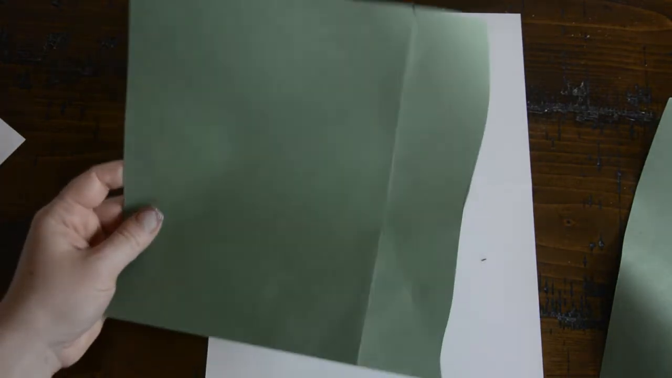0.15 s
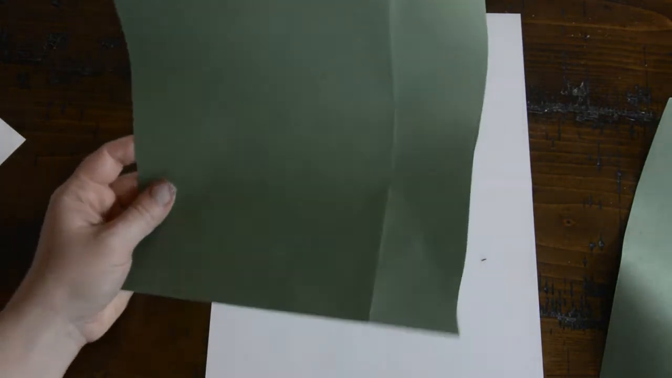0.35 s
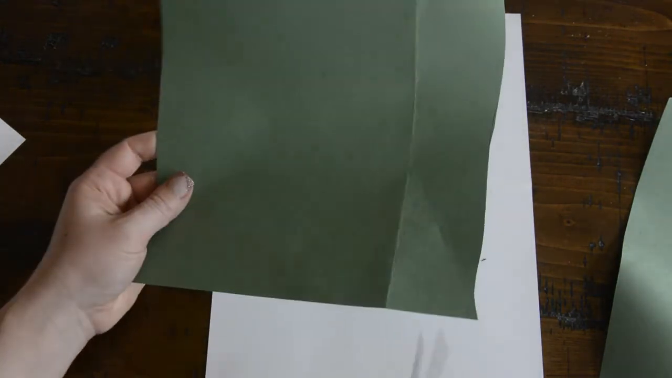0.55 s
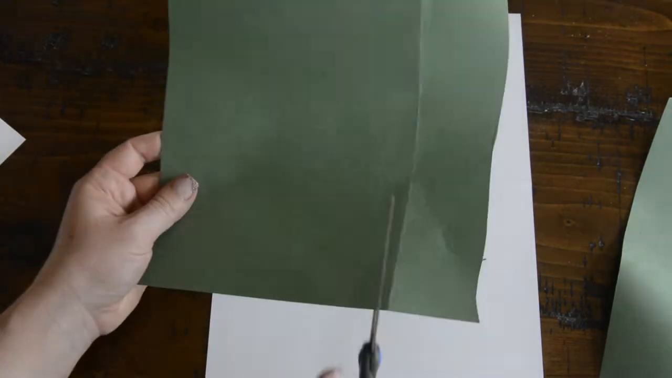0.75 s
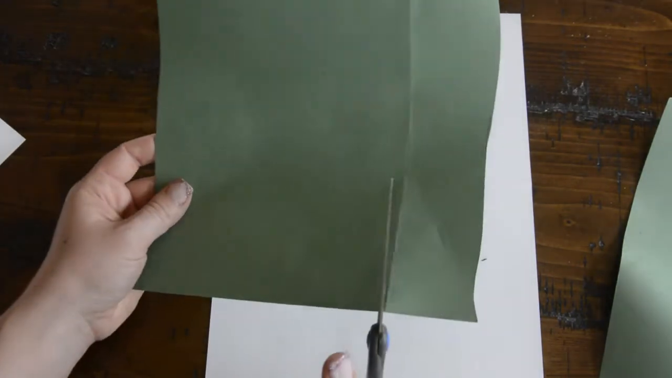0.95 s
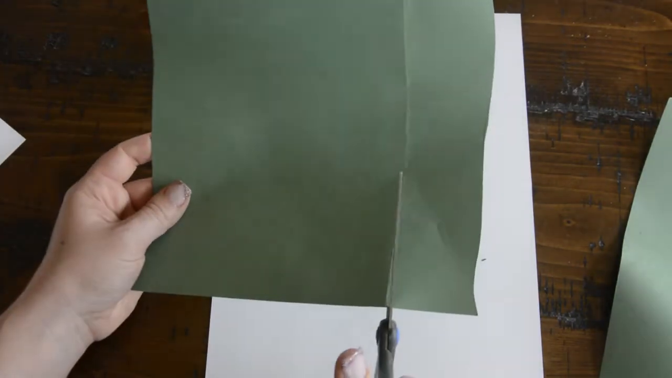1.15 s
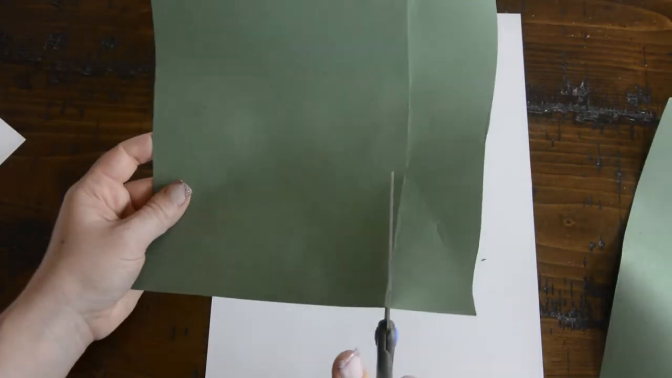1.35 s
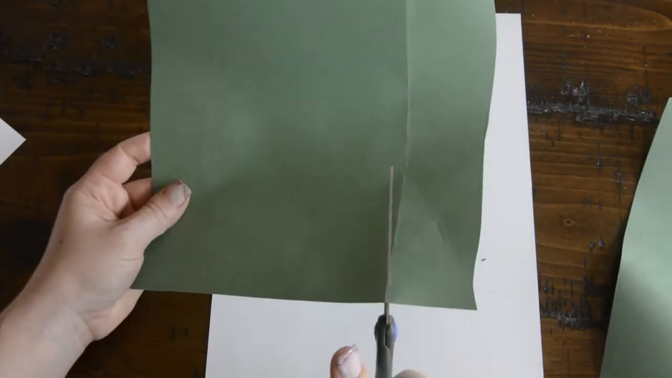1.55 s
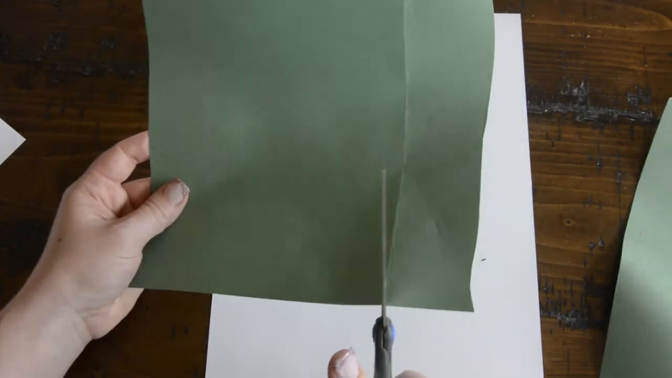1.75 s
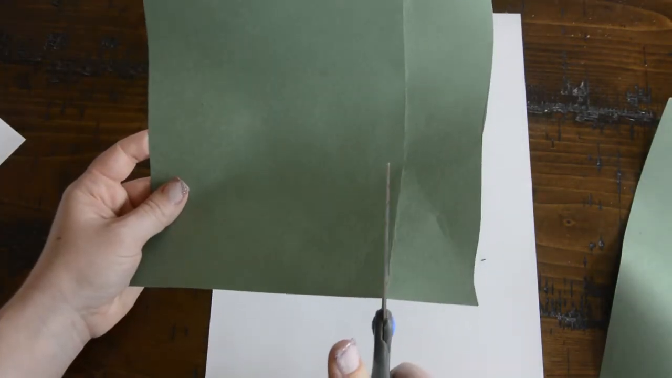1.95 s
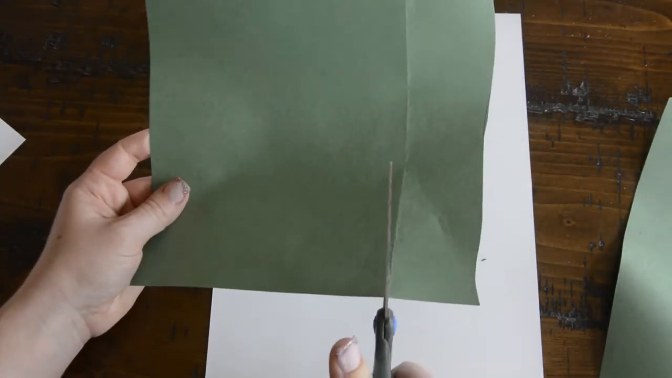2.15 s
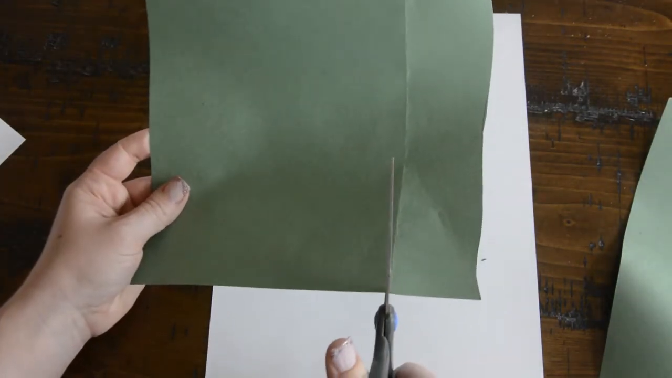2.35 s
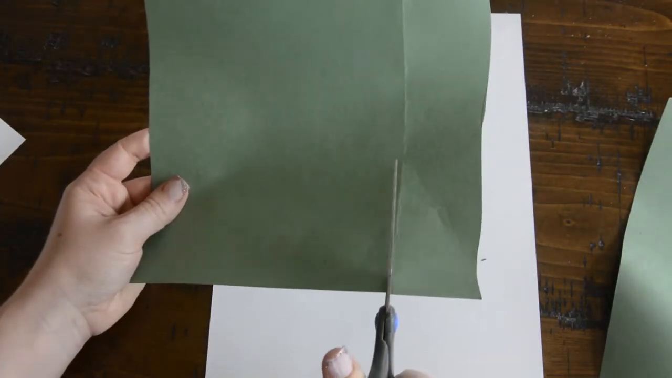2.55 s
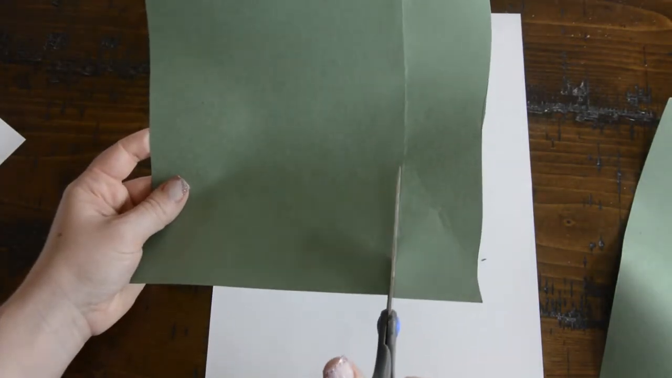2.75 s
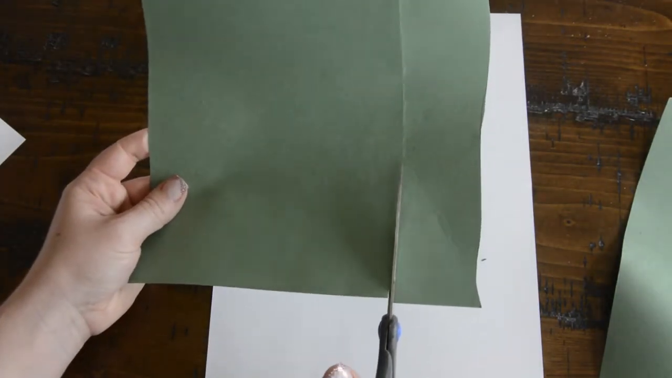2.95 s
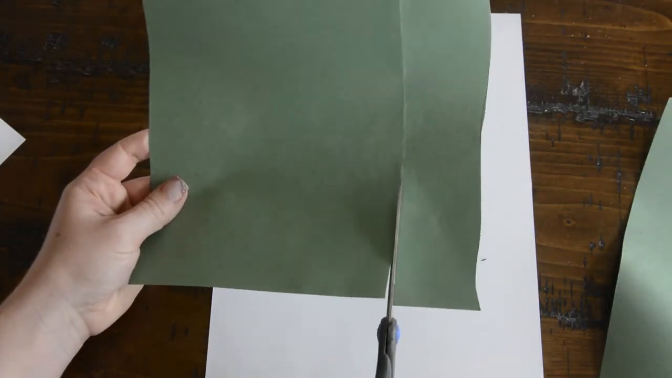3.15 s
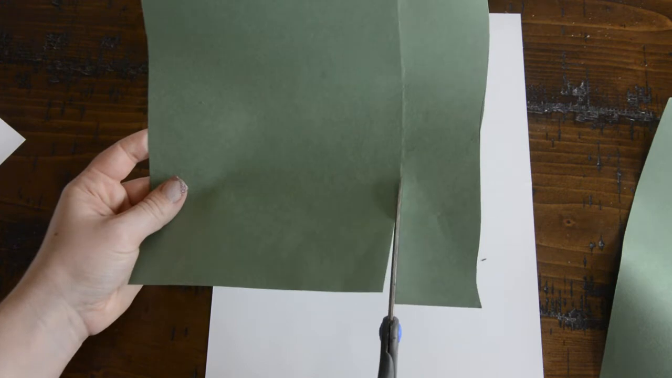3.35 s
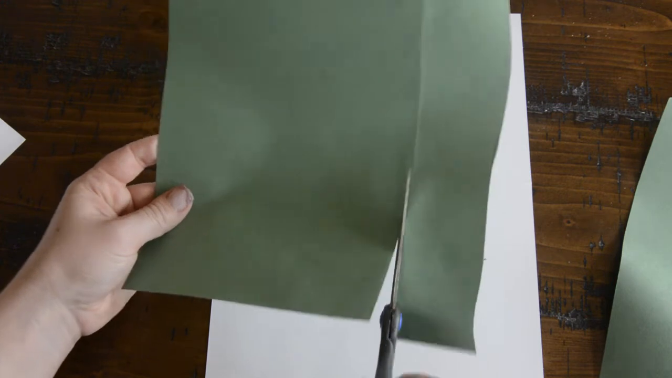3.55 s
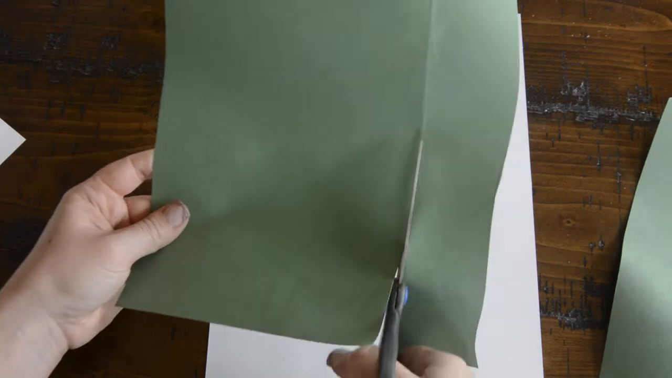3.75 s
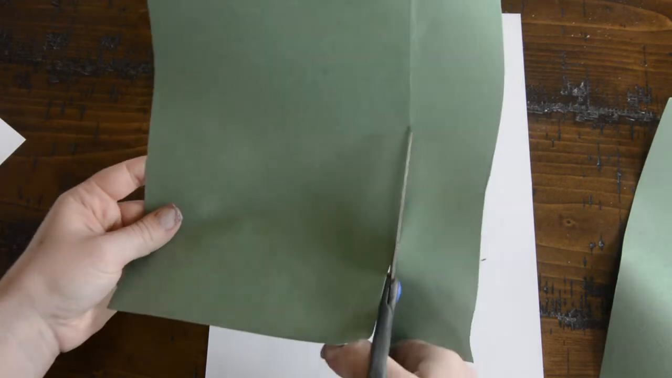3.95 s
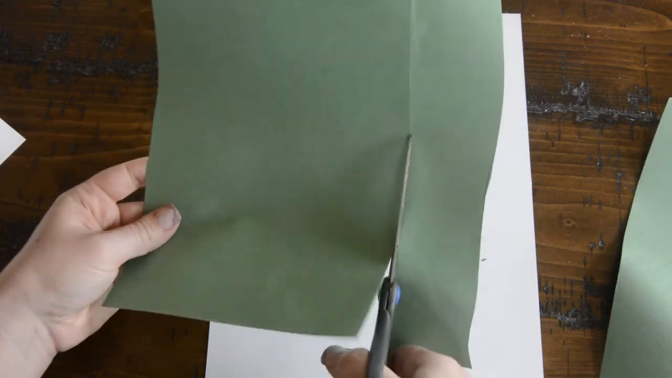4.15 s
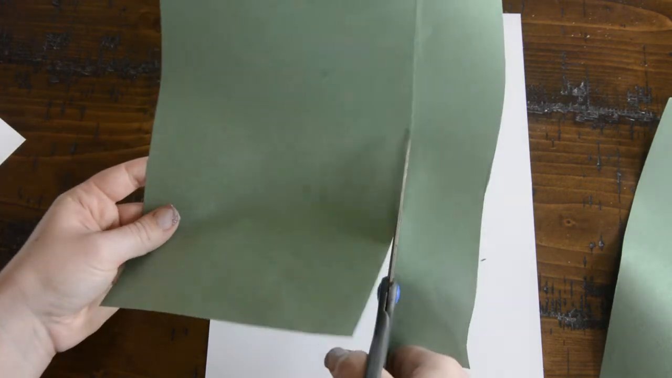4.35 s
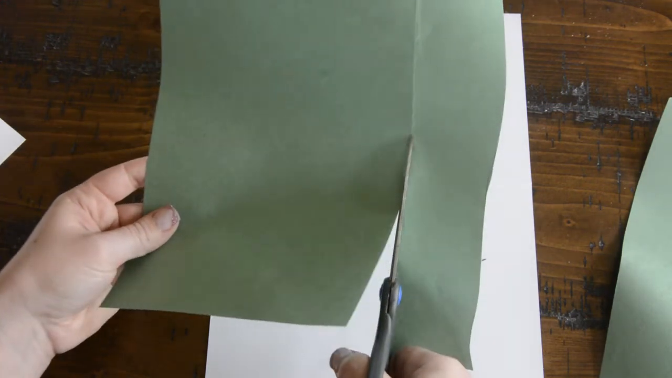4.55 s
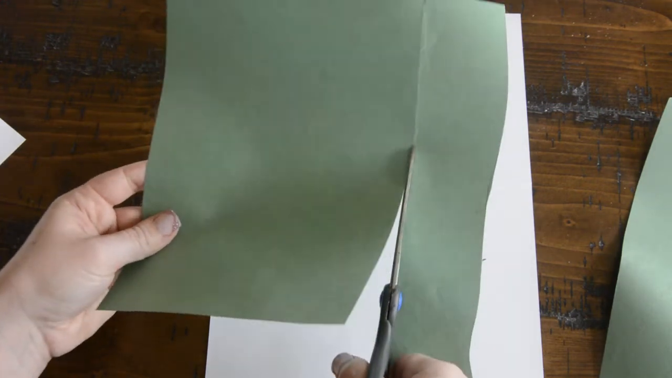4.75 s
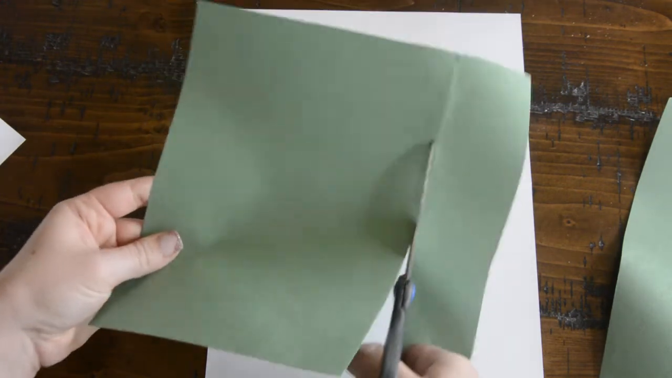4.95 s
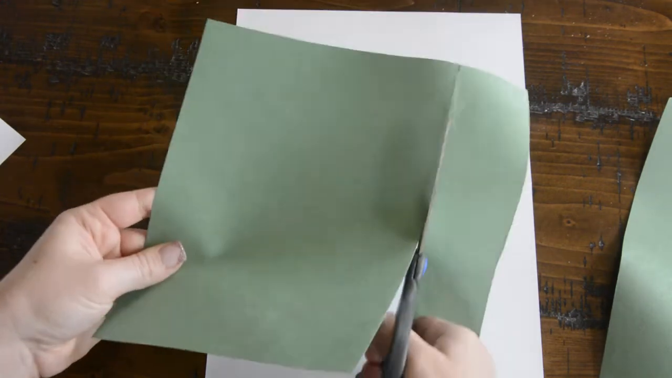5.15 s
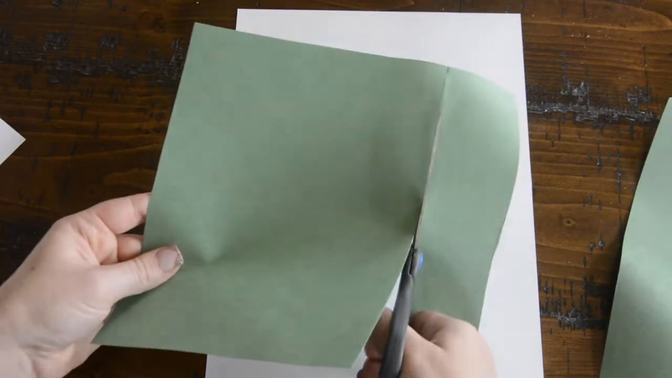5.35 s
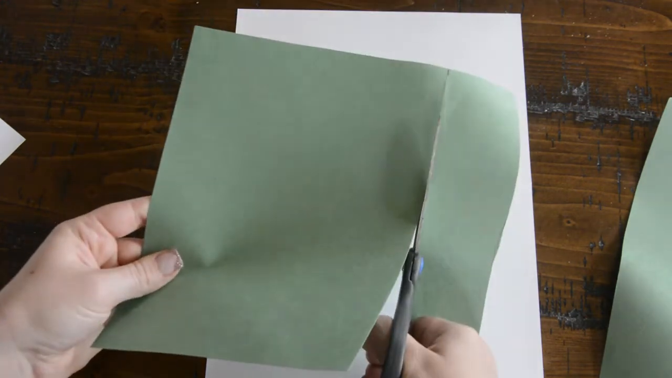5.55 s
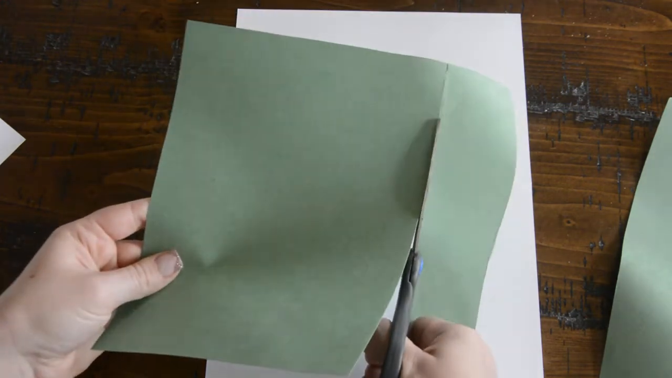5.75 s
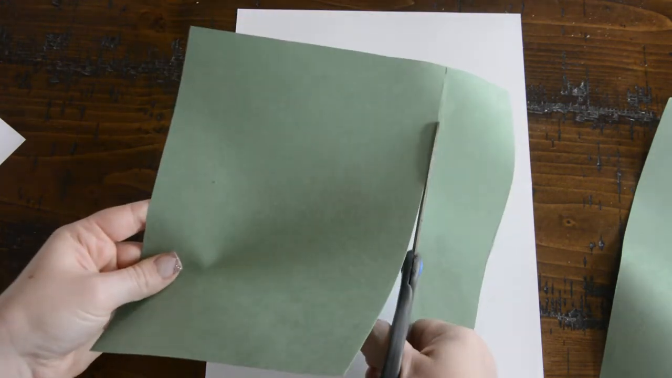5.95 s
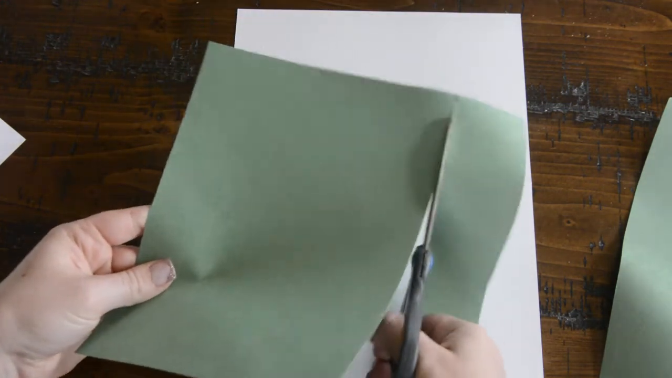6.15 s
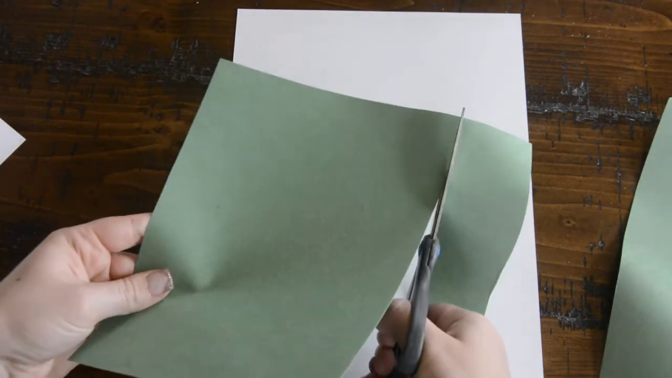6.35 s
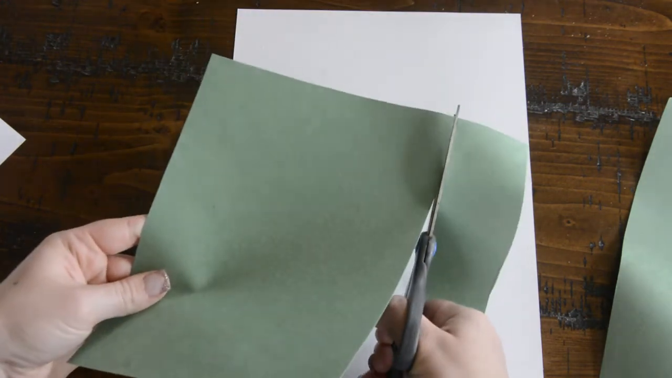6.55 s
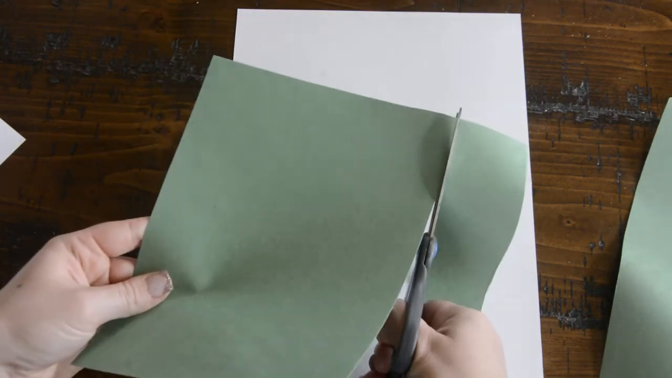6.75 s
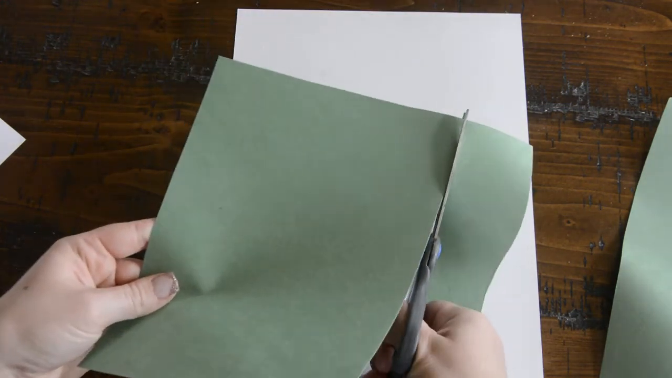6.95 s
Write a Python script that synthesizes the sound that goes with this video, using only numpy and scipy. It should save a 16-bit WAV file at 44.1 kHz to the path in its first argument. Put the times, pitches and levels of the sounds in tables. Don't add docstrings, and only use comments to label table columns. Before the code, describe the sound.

Close stereo sound of scissors and stiff paper in a small hard room. Hard clacks ring at the start, then a dull thud, light brushes and taps on the sheet. After a quiet gap, slow crackling cuts tear the fibres in small bursts. Between strokes the blades rub forward up the slit and the loose strip flaps. Soft low room rumble and hiss lie beneath.

```python
import sys
import numpy as np
from scipy import signal
from scipy.fft import rfft, irfft, next_fast_len
from scipy.io import wavfile
from scipy.ndimage import uniform_filter1d, map_coordinates

SR = 44100
rng = np.random.default_rng(int(sys.argv[2]) if len(sys.argv) > 2 else 0)


def field_ratio(decibels):
    return 10 ** (np.asarray(decibels, dtype=float) / 20)


def digitize_waveform(pressure):
    field = np.atleast_2d(pressure).T
    bounded = np.clip(field, -1, 1)
    quanta = np.round(bounded * 32767).astype(np.int16)
    wavfile.write(sys.argv[1], SR, quanta)


N = 312845

# f/Hz, side over mid/dB
SIDE_WIDTH = [(100, -22), (700, -32), (2000, -24), (5000, -13), (8000, -13), (14000, -10)]


def unit(x):
    return x / np.sqrt(np.mean(x ** 2) + 1e-20)


def along(points, hz):
    f, value = np.transpose(points)
    return np.interp(np.log(hz + 1), np.log(f + 1), value)


def filtered(x, response):
    m = next_fast_len(N + SR // 2)
    return irfft(rfft(x, m) * response(np.fft.rfftfreq(m, 1 / SR)), m)[..., :N]


def ringing(x, modes):
    def shape(f):
        total = 0
        for k, (centre, width, db) in enumerate(modes):
            resonance = 1j * f * width / (centre ** 2 - f * f + 1j * f * width)
            total = total + (-1) ** k * field_ratio(db) * resonance
        return total ** 2

    gain = np.sqrt(np.mean(np.abs(shape(np.linspace(1, SR / 2, num=4000))) ** 2))
    return filtered(x, shape) / gain


def swells(rows):
    t = np.arange(N) / SR
    return sum(field_ratio(db) * np.exp(-((t - s) / length) ** 2) for s, db, length in rows)


def pair(mid, side):
    return np.array([mid + side, mid - side])


def room_tone():
    # f/Hz, level per Hz/dB
    spectrum = [(15, -49), (25, 0.5), (157, -11), (293, -5), (624, -4), (695, -7), (1130, -8), (1330, -10),
                (1790, -10), (2480, -14.5), (3080, -14.5), (6050, -19.5), (16000, -22)]
    # f/Hz, correlation
    likeness = [(30, 0.98), (100, 0.89), (600, 0.91), (3000, 0.52), (6000, 0.093), (9000, 1)]

    def response(hz):
        turn = np.arccos(np.clip(along(likeness, hz), -1, 1)) / 2
        return field_ratio(along(spectrum, hz)) * [np.cos(turn), np.sin(turn)]

    mid, side = filtered(rng.standard_normal((2, N)), response)
    return field_ratio(-55) * unit(pair(mid, side))


def rumble():
    # t/s, level/dB, length/s
    shifts = [(.1, -63, 0.06), (.62, -48, .03), (.7, -59, 0.05), (3.72, -65, 0.029), (4.24, -72, .05),
              (5.07, -61, 0.026), (6.2, -69, .08), (6.85, -71, 0.068)]
    rest_db = -70.5
    table_modes = [(99.0, 43, 1.4), (165, 83, -1.0)]  # f/Hz, width/Hz, level/dB
    return (field_ratio(rest_db) + swells(shifts)) * ringing(rng.standard_normal(N), table_modes)


def clacks():
    # t/s, handle/dB, board over handle/dB, steel over handle/dB, direct over room path/dB
    contacts = [
        (.001, -3, -3.5, -19, -5),
        (.111, -3.5, -3.5, -15, -6.5),
        (0.416, -24, -12, 3, -5),
        (0.5991, 5, -13.5, -7, 1.5),
        (1.455, -43, 1, 19.5, 11.5),
    ]
    # t/s, thud/dB, board/dB relative, direct path/dB
    thuds = [
        (.004, -14.5, -30, -7),
        (.73, -15.5, 1, 0),
        (4.22, -23.5, -20, -1),
        (4.8, -26, -16, 1),
    ]
    # f/Hz, width/Hz, level/dB
    handle = [(1867, 940, 2), (2390, 620, 6.5), (3040, 2000, -1)]
    board = [(685, 460, -2), (1143, 120, 6), (1410, 620, -1.5)]
    tabletop = [(124, 160, -8), (270, 178, 0), (454, 590, -7)]
    steel = [(5150, 720, 6), (7640, 1800, 1), (10840, 2200, 3), (14800, 3000, -1.5)]
    clack_thud_db = -20
    rattle_s, steel_room_db = 0.0025, -3

    hits = []
    for s, db, board_db, steel_db, near_db in contacts:
        hits.append((s, db + np.array([0, board_db, clack_thud_db, steel_db]), near_db))
    for s, db, board_db, near_db in thuds:
        hits.append((s, db + np.array([-20, board_db, 0, -30]), near_db))
    paths = np.zeros((4, 2, N))
    for s, levels_db, near_db in hits:
        paths[:, :, round(s * SR)] = field_ratio(levels_db[:, None] + [0, near_db])

    t = np.arange(SR // 30) / SR
    chatter = np.exp(-t / rattle_s) * rng.standard_normal(len(t))
    chatter /= np.linalg.norm(chatter)
    blades_room = paths[3, 0] * field_ratio(steel_room_db)
    blades_direct = signal.fftconvolve(paths[3, 1], chatter)[:N]
    paths[3] = blades_room, blades_direct
    return sum(ringing(path, modes) for path, modes in zip(paths, (handle, board, tabletop, steel)))


def gains(rows, attack, release, fizz_db):
    t, out = np.arange(N) / SR, 0
    for start, end, first_db, last_db, bright_db in rows:
        swell = np.clip((t - start) / attack + .5, 0, 1)
        decay = np.exp(-np.clip(t - end, 0, 1) / release)
        force = field_ratio(np.interp(t, [start, end], [first_db, last_db]))
        out = out + swell * decay * force * field_ratio([[0], [bright_db], [bright_db + fizz_db]])
    return out


def grit(rate, depth_db, spike_db):
    clumps = map_coordinates(rng.standard_normal(int(N * rate / SR) + 4), [np.arange(N) * rate / SR])
    level_db = depth_db * clumps + spike_db * rng.standard_normal(N)
    return unit(field_ratio(level_db) * rng.standard_normal(N))


def paper(drive, low, middle):
    # f/Hz, width/Hz, level/dB
    fizz = [(6320, 2570, 2.5), (11270, 3000, 4), (13750, 1380, 5), (17350, 1540, 5.5)]
    return sum(ringing(part, modes) for part, modes in zip(drive, (low, middle, fizz)))


def sliding():
    # start t/s, end t/s, first level/dB, last level/dB, brightness/dB
    slides = [
        (1.443, 1.451, -40.5, -41, 1),
        (3.497, 3.63, -38.5, -42.5, 1),
        (3.63, 3.882, -38.5, -43, 0),
        (4.044, 4.1, -55, -52, 1.5),
        (4.915, 5.17, -35, -43, 0.5),
        (5.18, 5.27, -47.5, -52, -0.5),
        (6.112, 6.175, -43, -46.5, 0.5),
        (6.18, 6.35, -46, -49, 9),
        (6.39, 6.465, -50.5, -51, 7),
    ]
    opening = [
        (.407, .425, -56.5, -58, 14),
        (.425, .5, -61, -70, 8.5),
    ]
    # t/s, level/dB, length/s
    flaps = [(3.55, -37.5, 0.019), (3.68, -48, 0.025), (3.745, -35.5, 0.014), (3.785, -34.5, 0.012),
             (3.875, -39.5, 0.0037), (5.045, -44, 0.014), (6.14, -45, 0.0091), (6.2, -41, 0.02)]
    # f/Hz, width/Hz, level/dB
    strip = [(347, 202, -6.5), (593, 254, -1.5), (852, 454, 2), (1280, 1190, -3)]
    # f/Hz, width/Hz, level/dB
    rub = [(1970, 3170, -5), (3420, 1430, 2), (4064, 440, 1.5), (5290, 1470, -4.5)]
    force = gains(slides, attack=0.01, release=0.0047, fizz_db=-7.5)
    force = force + gains(opening, attack=0.01, release=0.0047, fizz_db=1)
    force = force + swells(flaps) * field_ratio([[0], [-8], [-18]])
    return paper(force * grit(120, depth_db=1.5, spike_db=2.0), strip, rub)


def timed(tables, length_s):
    rows = np.concatenate(tables)
    force_db = rows[:, 1:2]
    scatter = .18 * rng.standard_normal((len(rows), 1))
    lengths = length_s * np.exp(scatter - 0.02 * (force_db - force_db.mean()))
    return np.hstack([rows + [0, 1, 0], lengths])


def slips(rows, rise, fizz_db):
    t, levels = np.arange(SR // 20) / SR, np.zeros((3, N + SR))
    for (s, db, drum_db, length), luck in zip(rows, rng.standard_normal((len(rows), 1))):
        swell = 1 - np.exp(-(t / rise) ** 2)
        hold = np.exp(-(t / np.clip(length, .001, .02)) ** 4)
        parts_db = [[db + drum_db - 2.5], [db - 10.0], db + fizz_db + 1.3 * luck]
        levels[:, round((s - .0008) * SR):][:, :len(t)] += field_ratio(parts_db) * swell * hold
    return levels[:, :N] * grit(900, depth_db=1.0, spike_db=6)


def sticking(rows, lead, depth):
    t, free = np.arange(N) / SR, np.ones(N)
    for s, *_ in rows:
        before = slice(max(round((s - 3 * lead) * SR), 0), round(s * SR))
        free[before] *= 1 - depth * np.exp(-((s - t[before]) / lead) ** 2)
    return free


def cutting():
    # start t/s, end t/s, first level/dB, last level/dB, brightness/dB
    strokes = [
        (2.335, 2.53, -44.5, -38, -9),
        (2.53, 3.03, -39.5, -41.5, -6),
        (3.055, 3.36, -45, -34.5, -13),
        (4.1, 4.19, -39, -42.5, -3),
        (4.2, 4.51, -36.5, -39.5, -6),
        (4.523, 4.83, -36.5, -39, -3.5),
        (5.4, 5.7, -45, -42.5, -4),
        (5.7, 6.05, -38, -45.5, -3.5),
        (6.615, 6.8, -39, -42.5, -2.5),
        (6.8, 6.97, -52, -54, -0.5),
    ]
    feeding = [
        (.8, .9, -56, -50.5, 1),
        (.96, 1.205, -55, -48.5, 1),
        (1.23, 1.26, -56, -57, 1),
        (1.305, 1.32, -51, -61, -1),
        (1.844, 1.91, -35.5, -64, 1),
        (1.93, 1.98, -51, -51.5, 0.5),
    ]
    # t/s, peak level/dB, drum/dB
    # relative, length/s
    taps = [(0.833, -25, -25, 0.0051), (0.865, -36, -10, 0.0044), (1.174, -32, 2, 0.003),
            (1.2044, -37, -19, 0.0022), (1.305, -39, -1.5, 0.004), (1.831, -22.5, -1.5, 0.007),
            (1.846, -23, -4, 0.0079), (3.004, -22, -10, 0.0055), (3.378, -22, -5, 0.0054),
            (3.4966, -14, -21, 0.0052), (3.543, -16, -14, 0.0027), (3.737, -6.5, -5, 0.0041),
            (4.05, -30, -13, 0.0049), (4.0674, -30, 3.5, 0.0031), (4.908, -16, -9, 0.0036),
            (5.119, -19, 3, 0.0039)]
    # t/s, peak level/dB, drum/dB relative
    slips_first = [(2.3426, -35.5, -3), (2.3618, -38, -8), (2.413, -33, -4), (2.4249, -25.5, -10),
                   (2.4485, -37, -14), (2.489, -36.5, 1.5), (2.4986, -26.5, -3), (2.5304, -25.5, -4),
                   (2.5906, -36.5, 2), (2.6588, -31, 0), (2.699, -29, -13), (2.71, -34, -4),
                   (2.7549, -22, -20), (2.7808, -28, -22), (2.8137, -22.5, -10), (2.8424, -23, -9),
                   (2.8723, -23, -19), (2.8973, -23.5, -3.5), (2.916, -14.5, -9.5), (2.9516, -19.5, -9.5),
                   (2.9812, -21, -4.5), (3.0282, -43, -6)]
    slips_second = [(3.0564, -28.5, 0), (3.0789, -14.5, -9), (3.1156, -20, -6.5), (3.1355, -28, -8),
                    (3.1516, -19, -2.5), (3.182, -44, -4), (3.2045, -17, -12), (3.231, -25.5, -4),
                    (3.2563, -20.5, -6), (3.2838, -21, -3.5), (3.3144, -18, -3.5), (3.3398, -19, -7),
                    (3.3618, -25, -12)]
    slips_fast = [(4.1027, -29, -8), (4.125, -28.5, -6), (4.1428, -27, -8), (4.171, -28, -19),
                  (4.2014, -27, -5), (4.2181, -17.5, -6), (4.2666, -24, -12), (4.2994, -27, -20),
                  (4.321, -33, -12), (4.3363, -21.5, -10), (4.372, -21.5, -12), (4.3978, -20, -10.5),
                  (4.4196, -21, -8), (4.4453, -18, -12), (4.4737, -21, -16), (4.5238, -21.5, -10),
                  (4.5398, -15.5, -11.5), (4.5763, -25, -14), (4.6155, -20.5, -8), (4.6361, -25, -12),
                  (4.6545, -22, -15), (4.673, -28, -16), (4.7117, -21, -9), (4.7389, -17.5, -10),
                  (4.7594, -20, -7), (4.8064, -25, -13), (4.8234, -17, -29)]
    slips_slow = [(5.3763, -40, -3), (5.4075, -33, -8), (5.4262, -28, -1.5), (5.454, -31, -9),
                  (5.4734, -29, -2), (5.4987, -39, -7), (5.528, -20, -6), (5.581, -30, -3),
                  (5.595, -27, -0.5), (5.6342, -21, -6), (5.6572, -27.5, -5), (5.6848, -21, -9),
                  (5.7226, -23, -18), (5.758, -19, -19), (5.781, -19, -12), (5.8123, -26, -5),
                  (5.8589, -28.5, -1), (5.8825, -23, -10), (5.899, -24, -18), (5.913, -29.5, -2)]
    slips_last = [(5.9403, -15, -5), (5.9673, -21, -7), (5.9824, -19.5, -14), (5.9899, -21.5, -5.5),
                  (6.0097, -21, -5), (6.617, -31, -21), (6.6513, -35, -10), (6.6786, -26.5, -6),
                  (6.7058, -23, -7.5), (6.724, -26.5, -8.5), (6.742, -23.5, -4), (6.78, -29.5, 1),
                  (6.815, -34, -4), (6.849, -23.5, 0.5), (6.8727, -21.5, -8), (6.9106, -29.5, -12),
                  (6.9463, -28, -28)]
    # f/Hz, width/Hz, level/dB
    drum = [(577, 567, -5), (832, 189, 3.5), (1057, 313, 1), (1750, 670, -4.5)]
    # f/Hz, width/Hz, level/dB
    fibres = [(2150, 800, -4), (3100, 950, -1), (4020, 540, 0.5), (5450, 1300, -7)]
    # f/Hz, width/Hz, level/dB
    snap = [(1930, 1310, -3.5), (3180, 990, 2.5), (3900, 600, 2), (5320, 1460, -6)]

    grinds = timed([slips_first, slips_slow], length_s=.009)
    snaps = np.concatenate([timed([slips_second], length_s=0.0073),
                            timed([slips_fast], length_s=.0095),
                            timed([slips_last], length_s=0.0073)])
    tears = grit(170, depth_db=3, spike_db=4)
    stuck = sticking(np.concatenate([grinds, snaps]), lead=0.007, depth=0.8)
    creep = gains(strokes, attack=0.0091, release=0.0067, fizz_db=-7.5) * stuck * tears
    brush = gains(feeding, attack=0.0048, release=0.0027, fizz_db=-16) * grit(200, depth_db=2.5, spike_db=1.5)
    edge = creep + slips(grinds, rise=0.004, fizz_db=-18)
    sheet = brush + slips(snaps, rise=0.0019, fizz_db=-20.0) + slips(taps, rise=0.004, fizz_db=-19.0)
    return paper(edge, drum, fibres) + paper(sheet, drum, snap)


def shifting(x, depth_db):
    hz, _, z = signal.stft(x, SR, nperseg=256)
    field = uniform_filter1d(rng.standard_normal(z.shape), size=6, axis=0)
    field = unit(uniform_filter1d(field, size=40, axis=1))
    treble = np.clip(hz / 7000, 0, 1)[:, None]
    return signal.istft(z * field_ratio(depth_db * field * treble), SR, nperseg=256)[1][:N]


def near(x):
    side = filtered(shifting(x, depth_db=7), lambda f: 1j * field_ratio(along(SIDE_WIDTH, f) - 7))
    return pair(x, side)


def room(x, delay, early_db, early_s):
    # f/Hz, t60/s
    decay_times = [(150, 0.29), (1000, 0.88), (3000, 0.66), (7000, 0.69), (14000, 0.39)]
    hz, t, z = signal.stft(rng.standard_normal((2, SR)), SR, nperseg=256)
    decay_db = early_db * np.exp(-(t / early_s) ** 4) - 60 * t / along(decay_times, hz)[:, None]
    tail = signal.istft(z * field_ratio(decay_db), SR, nperseg=256)[1]
    tail = np.pad(tail / np.linalg.norm(tail[0]), ((0, 0), (round(delay * SR), 0)))
    mid, side = signal.fftconvolve(x[None], tail, axes=1)[:, :N]
    return pair(mid, filtered(side, lambda f: field_ratio(along(SIDE_WIDTH, f) + 1.0)))


def scene():
    sheet = shifting(cutting() + sliding(), depth_db=2.2)
    knocks, direct = clacks()
    close = near(sheet + direct + rumble())
    sheet_room = field_ratio(-6.5) * room(sheet, .005, early_db=6, early_s=0.027)
    knock_room = field_ratio(4.5) * room(knocks, .002, early_db=2.5, early_s=0.053)
    return close + sheet_room + knock_room + room_tone()


def low_pass(x):
    return signal.sosfilt(signal.butter(12, 16850, fs=SR, output="sos"), x)


def record(dry):
    mix = filtered(dry, lambda f: (1j * f / (1j * f + 55)) ** 4 * (f < 15950))
    return low_pass(mix)


dry = scene()
out = record(dry)
digitize_waveform(out)
```